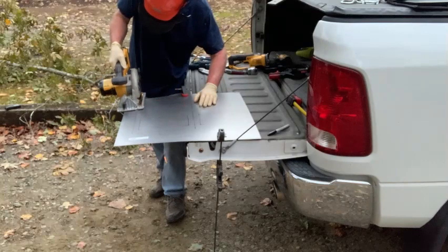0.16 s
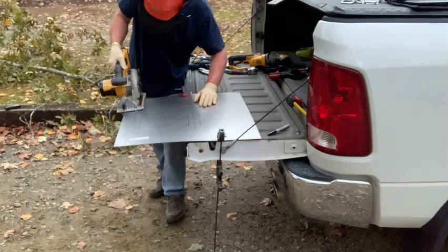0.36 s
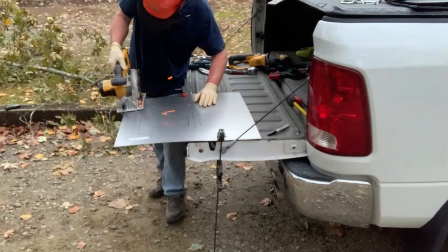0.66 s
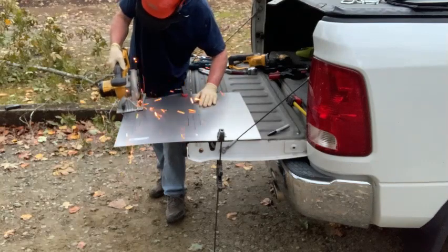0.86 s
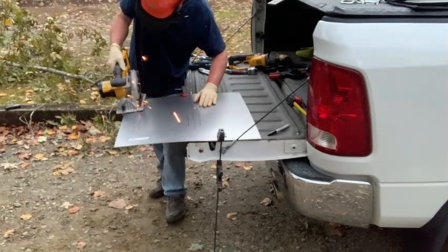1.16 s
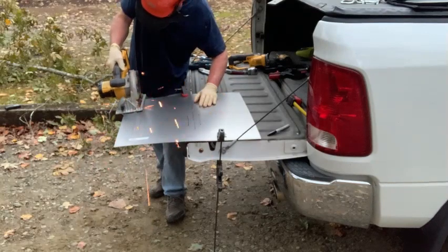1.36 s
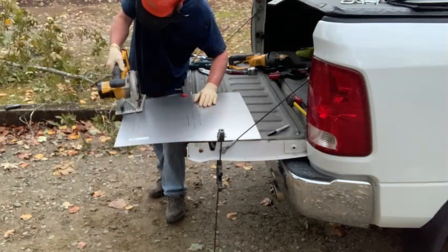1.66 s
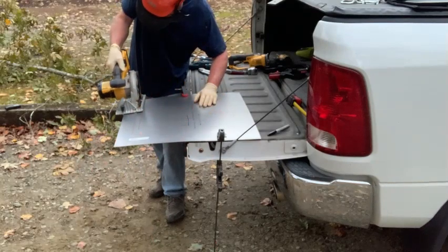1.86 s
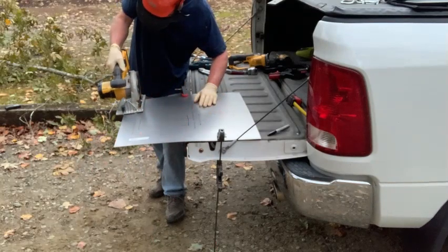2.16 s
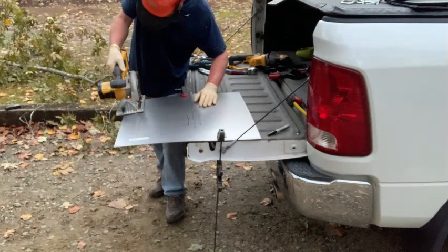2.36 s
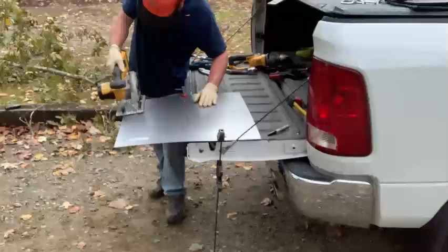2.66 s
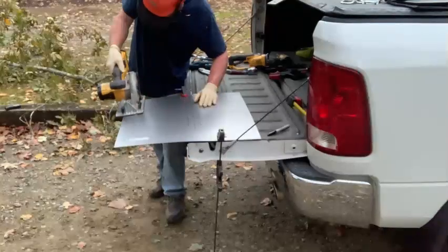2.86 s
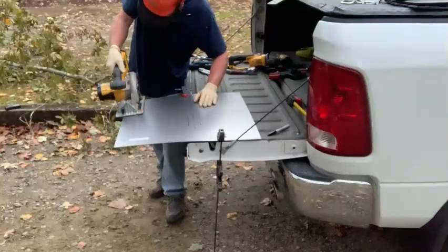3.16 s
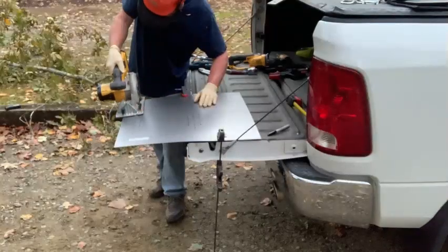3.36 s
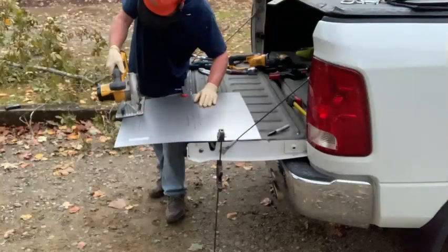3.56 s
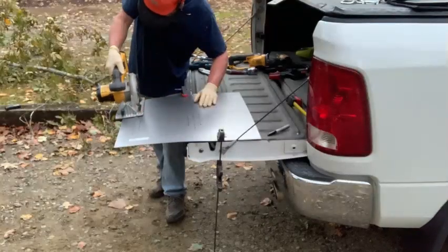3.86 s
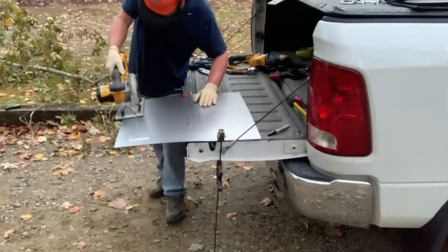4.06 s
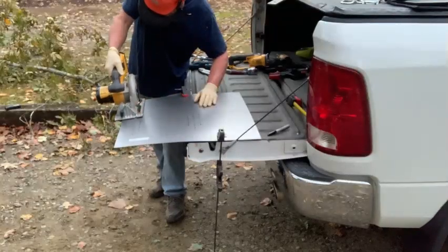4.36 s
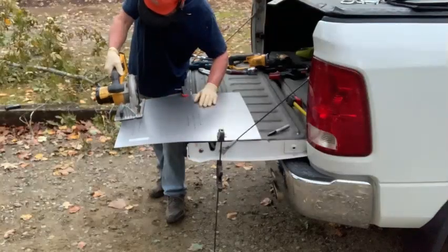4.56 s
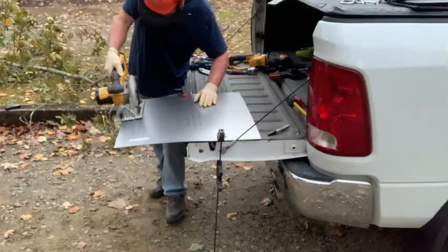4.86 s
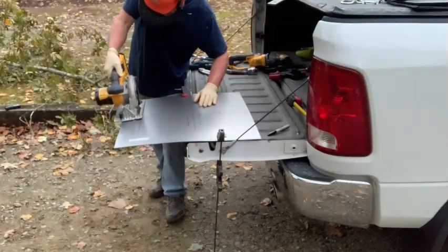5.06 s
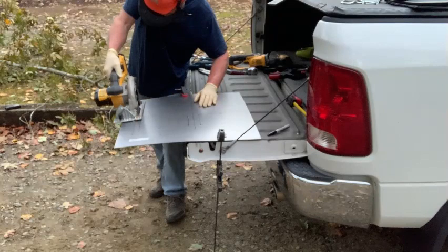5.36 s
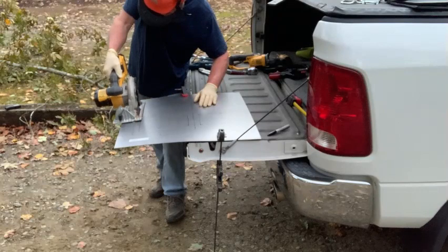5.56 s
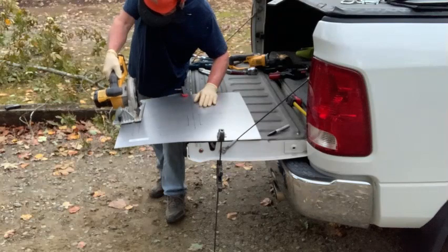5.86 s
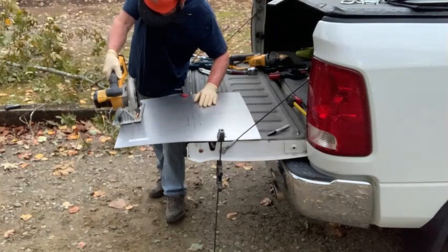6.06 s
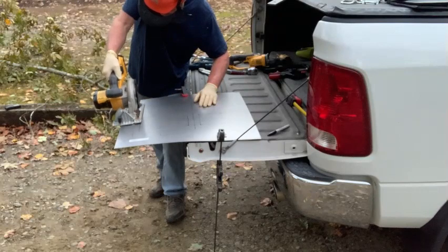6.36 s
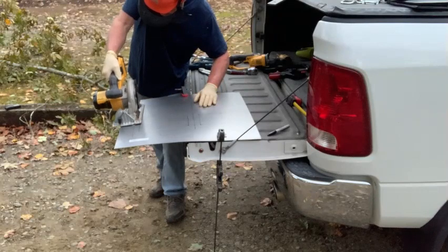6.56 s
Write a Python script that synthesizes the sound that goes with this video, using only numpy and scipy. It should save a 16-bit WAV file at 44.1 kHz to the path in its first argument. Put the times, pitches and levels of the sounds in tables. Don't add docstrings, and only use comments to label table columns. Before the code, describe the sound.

A handheld circular saw screeches steadily through thin sheet steel outdoors, harsh and bright, with short singing tones flaring over the metallic hiss.

```python
import sys
import numpy as np
from scipy import signal
from scipy.fft import rfft, irfft, next_fast_len
from scipy.io import wavfile
from scipy.ndimage import uniform_filter1d, minimum_filter1d, map_coordinates

SR = 44100
rng = np.random.default_rng(int(sys.argv[2]) if len(sys.argv) > 2 else 0)


def level_to_linear(level):
    exponent = np.asarray(level, float) / 20
    return 10 ** exponent


def to_wav(sig):
    pcm = np.clip(np.atleast_2d(sig), -1, 1) * 32767
    pcm = np.round(pcm).astype(np.int16)
    wavfile.write(sys.argv[1], SR, pcm.T)


N = 295911
GEAR = 5.25


def unit(x):
    return x / np.sqrt(np.mean(x ** 2) + 1e-20)


def along(points, hz):
    f, v = np.transpose(points)
    return np.interp(np.log(hz + 1), np.log(f + 1), v)


def curve(rows, x):
    return np.interp(x, *np.transpose(rows))


def wobble(rate_hz, t):
    knots = rng.standard_normal(200 * N // SR + 9)
    return map_coordinates(knots, [t * rate_hz + 2])


def filtered(x, response):
    m = next_fast_len(N + 8192)
    return irfft(rfft(x, m) * response(np.fft.rfftfreq(m, 1 / SR)), m)[..., :N]


def bell(x, centre, width):
    return np.exp(-((x - centre) / width) ** 2)


# [t/s, f/Hz]
MOTOR_HZ = [(0, 352.8), (0.35, 349.2), (0.65, 360.2), (1.0, 344.6), (1.5, 329.8), (1.9, 324.3),
            (2.7, 328.5), (3.1, 324.3), (3.5, 302.2), (4.25, 307), (4.5, 295.6), (5.3, 291.9), (5.6, 273.9),
            (6.2, 280), (6.7, 274.8)]


def turns():
    return np.cumsum(curve(MOTOR_HZ, np.arange(N) / SR)) / SR


def slip(t):
    full_hz = 350
    return (curve(MOTOR_HZ, t) - full_hz) / GEAR


# [t/s, level/dB]
FREEDOM_DB = [(0, 0.5), (.4, 1.5), (1.76, 7), (1.88, -0.5), (2.3, -3), (2.55, 2.5), (3.1, 0.5), (4.3, -2.5),
              (6.71, -3.5)]


def freedom_db(t):
    return curve(FREEDOM_DB, t)


# [f/Hz, level/dB]
RUMBLE_DB = [(25, -30), (45, -7), (100, -10.5), (200, -11.5), (265, 4.5), (330, -3.5), (450, -5),
             (700, -49)]


def rumble():
    t = np.arange(N) / SR
    noise = unit(filtered(rng.standard_normal(N), lambda hz: level_to_linear(along(RUMBLE_DB, hz))))
    return level_to_linear(-60 + 0.09 * freedom_db(t) + 1.7 * wobble(5.5, t)) * noise


# [t/s, level/dB]
SHAFT_DB = [(0, -71.5), (.9, -69.5), (1.1, -66.5), (1.55, -69), (2.14, -77), (2.4, -66), (3.0, -68),
            (3.6, -67.5), (4.3, -73), (4.8, -82), (6.7, -78)]


def shaft():
    t, phase = np.arange(N) / SR, 2 * np.pi * turns() / GEAR
    first = level_to_linear(2.5 + 2.2 * wobble(8.3, t)) * np.sin(phase)
    second = level_to_linear(1.0 + 3.8 * wobble(3.43, t)) * np.sin(2 * phase)
    return level_to_linear(curve(SHAFT_DB, t)) * (first + second)


# [t/s, level/dB]
HUM_DB = [(0, -64), (.65, -66), (1.5, -66.5), (2.1, -71), (2.6, -64), (3.2, -69.5), (3.5, -61.5),
          (4.3, -54.5), (4.7, -74), (5.3, -55.5), (5.6, -64), (6.1, -61), (6.7, -60.5)]


def hum():
    t = np.arange(N) / SR
    level_db = curve(HUM_DB, t) + 10.5 + 3.8 * wobble(13, t)
    return level_to_linear(level_db) * np.sin(2 * np.pi * turns() + 0.48 * wobble(21, t))


# [t/s, f/Hz, level/dB]
WHISTLE_TRACK = [(4.45, 1285, -60), (4.62, 1285, -47), (4.68, 1260, -38), (4.88, 1259, -38),
                 (4.97, 1300, -46), (5.15, 1295, -45), (5.7, 1280, -35.5), (5.88, 1280, -37),
                 (6.0, 1315, -45), (6.35, 1312, -45), (6.6, 1278, -41), (6.71, 1275, -41)]


def whistle():
    t = np.arange(N) / SR
    s, hz, db = np.transpose(WHISTLE_TRACK)
    level_db = np.interp(t, s, db, left=-120) + 2.5 * wobble(12, t)
    phase = 2 * np.pi * np.cumsum(np.interp(t, s, hz)) / SR
    return level_to_linear(level_db) * np.sin(phase + 0.47 * wobble(25, t))


# [peak t/s, level/dB, hold before peak/s]
SINGING_BURSTS = [(.03, -46, .05), (1.55, -34.5, 0), (1.79, -40.5, 0.059), (2.35, -36, 0.0038),
                  (2.67, -39, 0.044), (2.88, -46, 0.12), (3.03, -31.5, 0.011), (3.18, -33, 0),
                  (3.38, -36, 0.043), (3.551, -34.5, 0), (3.73, -39.5, .03), (3.91, -39.5, 0.011),
                  (4.28, -44.5, 0.14), (4.48, -40, 0.004), (5.17, -35, 0.12), (5.42, -36, 0.13),
                  (5.6, -42, 0.071), (5.79, -39.5, 0.097), (5.96, -30.5, 0), (6.2, -42, .04),
                  (6.34, -45, .02), (6.53, -39.5, 0.0029), (6.71, -37, 0.003)]


def singing():
    build_db_per_s, collapse_db_per_s, idle_db = 198, 237, -60.5
    t = np.arange(N) / SR
    phase = 2 * np.pi * np.cumsum(1895 + 3 * slip(t)) / SR
    level_db = np.full(N, idle_db)
    for peak_s, db, held_s in SINGING_BURSTS:
        below_db = build_db_per_s * np.maximum(peak_s - held_s - t, 0)
        below_db += collapse_db_per_s * np.maximum(t - peak_s, 0)
        level_db = np.maximum(level_db, db - below_db)
    return level_to_linear(level_db + 10.5) * np.sin(phase + 1.15 * wobble(30, t))


# [t/s, share]
RUNOUT_SHARE = [(0, 1.2), (.3, 1.8), (.6, 1), (1.2, 1.4), (2, 1.2), (3, 1.1), (6.71, 1.3)]


def tooth_force(runout_db, chatter_db, flutter_db, spike):
    teeth = 30
    t, blade = np.arange(N) / SR, turns() / GEAR
    tooth = (blade * teeth).astype(int)
    size = level_to_linear(1.4 * rng.standard_normal(teeth * 80 * N // SR))[tooth]
    burst = 1 + spike * size * np.exp(-5 * (blade * teeth - tooth))
    swell_db = runout_db * curve(RUNOUT_SHARE, t) * np.sin(2 * np.pi * blade + 2.0 * wobble(2.825, t))
    return unit(burst * level_to_linear(swell_db + chatter_db * wobble(45, t) + flutter_db * wobble(14, t)))


# [t/s, level/dB]
FEED_DB = [(0, -4.5), (.24, -2), (.45, -4), (.85, -4.5), (1.4, -8), (1.55, -6), (2.2, -3.5), (2.32, 1),
           (2.52, -3.5), (3.1, 0.5), (3.45, 1), (3.85, 0), (4.35, 0.5), (4.6, -0.5), (4.9, 0.5), (6.1, 0),
           (6.71, 0.5)]
# [t/s, length/s, depth/dB]
GRIP_LULLS = [
    (0.599, 0.11, 7),
    (1.195, 0.088, 3.5),
    (1.653, 0.045, 2.5),
    (3.094, 0.059, 2),
    (5.016, 0.056, 1.5),
    (6.389, 0.035, 4),
]


def bite_db(t):
    feed = curve(FEED_DB, t)
    feed = feed - sum(db * bell(t, s, length) for s, length, db in GRIP_LULLS)
    return feed + np.outer([1, 0.69, 0], freedom_db(t))


# [f/Hz, width/Hz, depth/dB at start, buried, end]
SHEET_GAPS = [(425, 40, 3, 2, 2), (830, 29, -2, 7, 4), (1770, 46, 2, 0, 0), (4600, 70, -4, 1, 2),
              (5630, 55, 2, 1, 6), (6230, 120, -2, -1, 5), (13700, 250, 7, 4, 3), (2040, 75, 2, 9, 12),
              (2732, 60, 6, 2, 8), (3150, 115, 0, 22, 22), (3540, 85, 2, 16, 18), (4290, 60, 9, 2, 1),
              (5110, 110, 9, 7, 2), (4820, 60, 6, 6, 2), (4060, 40, 0, 5, 4)]


def gaps_db(hz, t):
    buried_s = 3.5
    times_s = [0, buried_s, N / SR]
    return -sum(bell(hz[:, None], c, w) * np.interp(t, times_s, depth) for c, w, *depth in SHEET_GAPS)


# [t/s, length/s, f/Hz, width/Hz, level/dB]
BAND_SWELLS = [(0.09, 0.13, 2630, 23, 22), (1.705, 0.18, 3900, 67, 13), (.58, 0.11, 2770, 180, 8),
                     (0.22, 0.29, 1370, 35, 8), (6.4, .3, 1580, 70, -9), (3.6, 0.23, 4100, 63.5, 5),
                     (2.84, 0.63, 2500, 67, -1), (3.1, 0.86, 1480, 53, 5.5), (2.13, 0.17, 4780, 150, 7),
                     (2.298, 0.3, 6700, 180, 7.5), (1.77, 0.3, 3760, 160, -3), (2.44, 1, 2550, 180, -4.5),
                     (3.8, 0.31, 4280, 290, 5), (4.01, 0.31, 3910, 91, 9), (6.34, .25, 2610, 43, 7),
                     (6.36, 0.24, 3300, 200, -5), (2.404, .25, 7600, 60, 8), (6.354, 0.34, 2400, 31, 16.5),
                     (6.3, 0.28, 555, 16, 12), (5.72, 0.21, 2800, 57, -2), (2.76, 0.57, 5480, 35, 4),
                     (5.14, 0.26, 3380, 51, 5.5), (0.11, 0.18, 6650, 80, 5.5), (2.12, .13, 250, 80, -10),
                     (5.9, .14, 2790, 81, 6), (0.728, 0.089, 2940, 310, -4), (6.36, .1, 14000, 2100, 0),
                     (6.1, 0.17, 4000, 650, -3.5), (0.58, 0.19, 3630, 470, 3.5), (5.3, 1, 465, 64, 8),
                     (6.6, .22, 160, 55, -14), (5.84, .2, 148, 60, -14), (2, 0.4, 3260, 80, -17),
                     (.12, .18, 3000, 84, -8), (0.65, 0.057, 3200, 200, -8), (1.7, 0.4, 3300, 48, 2),
                     (0.7, 0.29, 3810, 86, 1.5), (1.1, 1, 4440, 30, 1), (3.88, 0.064, 4900, 130, -16),
                     (1.53, 0.092, 5200, 170, -13),
                     (0, .26, 2760, 75, -11), (1.5, 0.82, 3110, 61, 11), (0, 0.34, 2860, 71, 9),
               (2.5, 0.68, 6100, 220, 6.5), (4.81, .29, 4460, 99, -7), (2.55, .4, 3290, 70, -11),
               (1.7, .4, 4400, 110, 6), (1.28, 0.58, 5300, 120, -9), (5, 0.35, 1636, 80, -4.5),
               (1, 0.25, 4890, 150, 7), (.84, 0.35, 4180, 100, -4), (0.43, 0.85, 1490, 96, 2.5),
               (7, 0.51, 5130, 88, 5), (.77, .31, 6610, 100, -6), (6.5, 0.74, 4330, 75, 5),
               (4, 0.57, 4800, 59.4, 7), (7.5, 0.67, 4670, 70, -3), (4, .55, 3640, 80, 9),
               (5.76, .36, 3910, 140, 6.5), (4, 0.55, 2010, 70, 9), (6.5, 0.7, 1730, 130, 4.5),
               (1.65, .31, 3450, 80, 7.5), (3, 0.33, 5280, 60, 5), (3.09, 0.39, 2370, 87, -8),
               (0.9, .79, 4740, 58, -4), (2, 0.61, 2080, 62, -7), (5.5, 0.47, 2000, 67, -10),
               (6.5, 0.23, 430, 43, -8), (4, 0.81, 10810, 160, 5), (6.18, 0.26, 12980, 270, 8),
               (5.29, 1.1, 11020, 180, -7), (4.5, .42, 14430, 170, 8), (3, 0.68, 9600, 200, -4),
               (0.7, 0.75, 13310, 250, 5), (5.5, .37, 8550, 130, 5), (5.43, 0.37, 9300, 270, -3.5),
               (4.99, .38, 8200, 270, -4), (-0.5, .35, 13780, 200, -7), (2, .5, 15160, 190, 8),
               (4.6, 1, 2790, 58, 2.5)]


def swells_db(hz, t):
    return sum(db * np.outer(bell(hz, c, w), bell(t, s, length))
               for s, length, c, w, db in BAND_SWELLS)


# [t/s, length/s, f/Hz, slide/(Hz/s), level/dB]
STRIP_SLIDES = [
    (3.203, 0.31, 6700, -1000, 3),
    (0.83, 0.3, 6000, -1200, 5),
    (1.52, .25, 5480, -100, 3),
    (4.63, 0.15, 3000, -200, -5),
    (4.97, 0.055, 2800, -200, 6),
    (4.9, 0.22, 860, -100, -7),
]


def slides_db(hz, t):
    width_hz = 150
    return sum(db * bell(hz[:, None], c + v * (t - s), width_hz) * bell(t, s, length)
               for s, length, c, v, db in STRIP_SLIDES)


# [t/s, length/s, f/Hz, width/Hz, phase/rad]
WORKER_LEANS = [
    (3.8, 0.52, 4780, 200, 2.3),
    (3.75, 0.34, 4400, 170, 0.5),
    (.3, 0.51, 4470, 200, 0.5),
]


def leaning(hz, t):
    phase = sum(turn * np.outer(bell(hz, c, w), np.exp(-((t - s) / length) ** 4))
                for s, length, c, w, turn in WORKER_LEANS)
    return np.exp(1j * phase)


CUT_STAGES_S = [0, 2.2, 4.4, 6.7]


def ringing(hz, t, modes, levels, width_hz, fade_db):
    out = np.zeros((len(hz), len(t)), complex)
    steady = level_to_linear([np.interp(t, CUT_STAGES_S, row) for row in levels])
    gains = steady * level_to_linear([fade_db * wobble(3.955, t) for _ in modes])
    gains *= np.linalg.norm(steady, axis=0) / np.linalg.norm(gains, axis=0)
    gains[::2] *= -1
    for (centre, diameters), gain in zip(modes, gains):
        near = abs(hz - centre) < 500
        detune_hz = hz[near, None] - centre - diameters * slip(t)
        out[near] += gain / (1 + 2j * detune_hz / width_hz) ** 1.196
    return out


# [f/Hz at full speed, nodal diameters (+ forward, - backward)]
RIM_MODES_HZ = [(7110, -6), (7435, 2), (7870, 12), (7850, -3), (8155, 6), (8455, -7), (8730, 4), (9080, 6),
                (9150, -3), (9320, 6), (9895, -1), (9870, -9), (10375, 4), (10470, 9), (10865, 9),
                (11325, -5), (11395, -9), (11685, -6), (11865, 12), (11995, 5), (12485, 9), (12915, -14),
                (13240, 7), (13830, 6), (14175, 10), (14690, 15), (14685, -3), (14795, -8), (15240, 5),
                (13445, -1)]
RIM_MODES_DB = [(-1, 1, 2, 2), (0, 0, 3, 1), (-18, 2.0, 0, 9), (5, 2.5, 11, 5), (4.5, 4.5, 6.5, -5),
                (-1, 4.5, 11.5, -11), (8, -18, -2, -6), (10, 7.5, 11, 13.5), (2.0, 14.5, 14, 9),
                (3, -1, -7, 13), (7, 9, 8, 12), (-6, 5, 13, 12.5), (-8, 8.5, 9, 10), (1, 8.5, 12, 11.5),
                (0, 8, 5.5, 12), (0, 6, -14, -6), (-2, 13.5, 12, 10), (6.5, 7, 4, 8), (6, 3.5, 12, 10),
                (3, 14, 13.5, 14), (9.5, 11.5, 0, 7), (9.5, 11.5, 12, 11), (1, -5, 9, 1), (10, 9, 7, 7),
                (8, 9, 9.5, 11.5), (9.5, 9.5, 6, 14.5), (6, -7, 11, 8), (6, 7.5, -3, 8), (-5, -3, 3, -3),
                (-5, -10, 7, -2)]
# [f/Hz at full speed, nodal diameters (+ forward, - backward)]
BODY_MODES_HZ = [(1195, 2), (1330, 3), (1380, 0), (1485, 0), (1615, -3), (2155, -3), (2300, 1), (2575, 4),
                 (2570, -1), (2885, -5), (3020, 2), (3435, 5), (3810, 0), (3930, -2), (4160, -4), (4445, 2),
                 (4710, -1), (4890, -4), (5090, 1), (5295, 3), (5505, 7), (5700, -7), (5905, -4), (6170, 6),
                 (6560, 1), (6630, 5), (6785, -2), (6850, -3)]
BODY_MODES_DB = [(-15, 0, -3, -8.5), (-6, -5, -1.5, -3.5), (2.5, -4, 1.5, 2.5), (-2.5, 6, 2.5, 6.5),
                 (3.5, 7, 11.5, 1.5), (-6, -6.5, -1.5, 0.5), (-14, -11, -3, -14), (-4, 2.5, 4.5, -3.5),
                 (-12, -6, -6, 3), (-6, 1, 1, 0.0), (-10, 5.5, -14, -1), (-2, 1, 1.5, 0.5),
                 (14.5, 5.5, 5, 2), (9.5, 2, 5, 3.5), (2.5, 0.5, 4.5, 5.5), (11, 2, 8, 1),
                 (6, 1.5, 1.5, 4.5), (3.5, -17, -2, 2.5), (6, -2, 4, 0), (-5.5, 2.5, 0, -1),
                 (6.5, 4.5, 7.5, 3), (-7, -7, 0, -2), (8, -7.0, -12, -9), (-22.0, -9, -14, -11.0),
                 (2, -1.5, 7.5, 9.5), (6.5, -5.5, -24, -7), (7, -12, -15, -18), (-10, -5, -2, -5)]
# [f/Hz, nodal diameters]
GATE_MODES_HZ = [(555, 0), (615, 0), (775, 0), (980, 0)]
GATE_MODES_DB = [(-28, -26, -10.5, -12.5), (-22, -24, -12, -35), (-16, -15, -6.5, -14),
                 (-15.5, -14, -33, -8)]
# [f/Hz, level/dB]
SCRAPE_DB = [(60, -45), (200, -29), (430, -20), (900, -15), (1400, -7.5), (2050, -9.5), (3200, -5.5),
             (4600, -11), (6100, -12), (7500, -7.5), (9200, 1.5), (11000, 0), (13600, -8.5), (15700, -7.5)]
# [f/Hz, amplitude 0-1]
SCATTER_SHARE = [(120, 0), (200, 0.62), (400, 0.55), (450, 0.4), (500, 0.34), (580, .55), (720, 0.46),
                 (830, 0.83), (950, 0.53), (1800, 0.38), (2000, 0.88), (2300, 0.63), (2800, 0.92),
                 (3600, 0.67), (4250, 0.49), (5000, 0.5), (5450, 1), (6050, 0.42), (6400, 1), (6750, 0.77),
                 (7200, 0.96), (9200, 0.31), (12000, 0), (15000, 0.66)]


def saw():
    window = 4096
    force = tooth_force(runout_db=1.5, chatter_db=1.0, flutter_db=0.53, spike=2.24)
    noise = force * rng.standard_normal((4, N))
    hz, t, z = signal.stft(noise, SR, nperseg=window, noverlap=window * 3 // 4)

    region = np.interp(np.log(hz + 1), np.log([1500, 2600, 5500, 8000]), [0, 1, 1, 2])
    level_db = np.array([np.interp(region, [0, 1, 2], column) for column in bite_db(t).T]).T
    quick_db = level_db - uniform_filter1d(level_db, size=75, axis=1)

    modes = ringing(hz, t, RIM_MODES_HZ, RIM_MODES_DB, width_hz=39.0, fade_db=2.5)
    modes += ringing(hz, t, BODY_MODES_HZ + GATE_MODES_HZ, BODY_MODES_DB + GATE_MODES_DB,
                     width_hz=14.8, fade_db=2.0)
    notches_db = gaps_db(hz, t)
    modes *= level_to_linear(1.5 + 0.6 * notches_db)

    patches = uniform_filter1d(rng.standard_normal(level_db.shape), size=14, axis=0)
    patches = uniform_filter1d(patches, size=8, axis=1)
    scrape = level_to_linear(along(SCRAPE_DB, hz)[:, None] + level_db + 3.8 * unit(patches) + notches_db)

    share = np.clip(along(SCATTER_SHARE, hz), 0, 1)[:, None]
    direct = modes * level_to_linear(quick_db) * z[0] + scrape * np.sqrt(1 - share ** 2) * z[1]
    pair = direct + share * (scrape + 0.36 * modes) * z[2:]
    pair *= level_to_linear(swells_db(hz, t) + slides_db(hz, t))
    pair[1] *= leaning(hz, t)
    sound = signal.istft(pair, SR, nperseg=window, noverlap=window * 3 // 4)[1][:, :N]
    return level_to_linear(-13.5) * unit(sound)


# [f/Hz, phase/rad]
CAPSULE_PHASE = [(0, 0), (320, 1.3), (430, 4.3), (520, 5.55), (775, 10.8), (860, 14), (950, 15.5),
                 (1070, 16.6), (1770, 16.3), (2080, 14.9), (2500, 15.7), (3800, 21.3), (4480, 21.2),
                 (4850, 19.8), (5200, 20.5), (5620, 19.7), (6100, 21.1), (13000, 21.5), (15500, 22.2)]
# [f/Hz, level/dB]
LEFT_RIGHT_DB = [(200, -0.7), (600, 1.5), (1500, 2), (2200, 0), (4000, -1.5), (5400, 2.5), (8500, 3),
                 (9800, 0), (15000, -1)]


def scene():
    lag_samples = 28
    left, right = rumble() + shaft() + hum() + whistle() + singing() + saw()

    def turn(hz):
        return np.exp(1j * (curve(CAPSULE_PHASE, hz) - 2 * np.pi * hz * lag_samples / SR))

    left = filtered(left, lambda hz: level_to_linear(along(LEFT_RIGHT_DB, hz) / 2))
    right = filtered(right, lambda hz: level_to_linear(-along(LEFT_RIGHT_DB, hz) / 2) * turn(hz))
    return np.array([left, right])


def top_cut(x):
    return signal.sosfilt(signal.butter(12, 15600, fs=SR, output="sos"), x)


def record(dry):
    power = uniform_filter1d((dry ** 2).mean(axis=0), size=SR // 6)
    level_db = 10 * np.log10(abs(power) + 1e-9)
    even = dry * level_to_linear(-0.5 * (level_db + 14.5))
    needed = np.minimum(1, 0.9 / (abs(even).max(axis=0) + 1e-9))
    held = even * uniform_filter1d(minimum_filter1d(needed, size=89), size=89)
    return top_cut(held)


dry = scene()
out = record(dry)
to_wav(out)
```